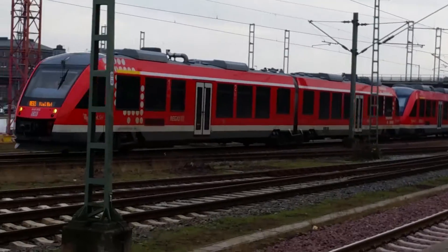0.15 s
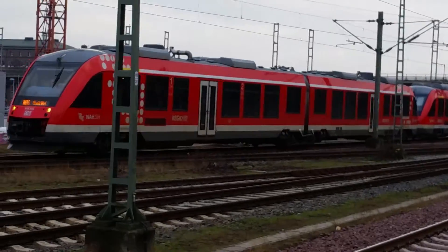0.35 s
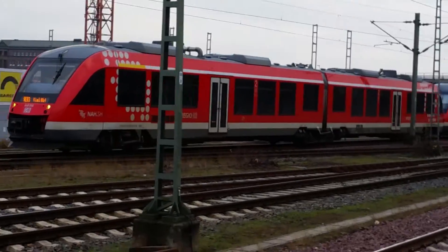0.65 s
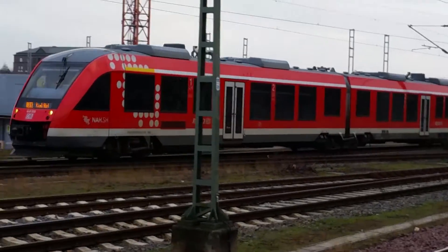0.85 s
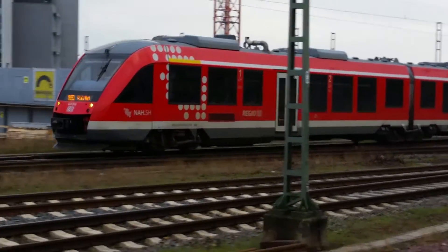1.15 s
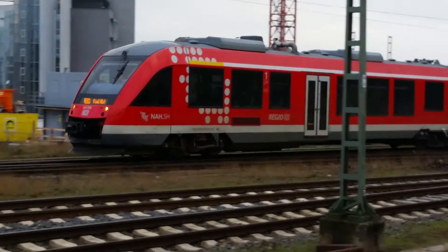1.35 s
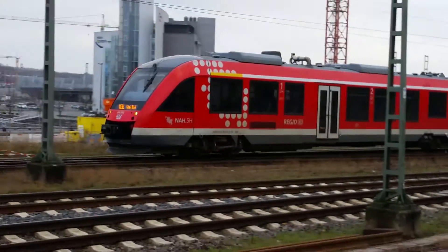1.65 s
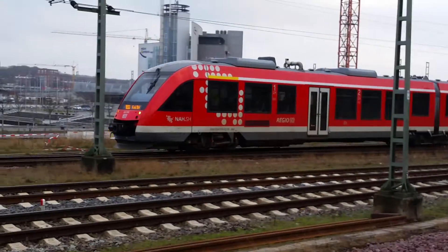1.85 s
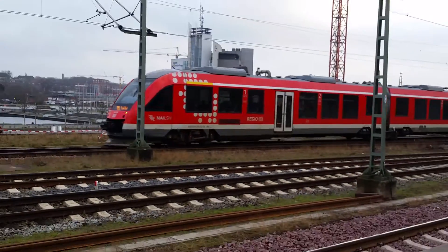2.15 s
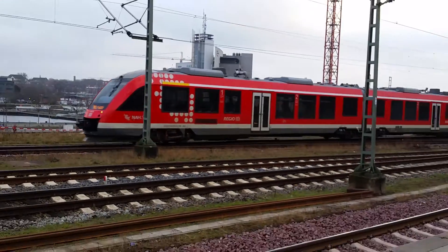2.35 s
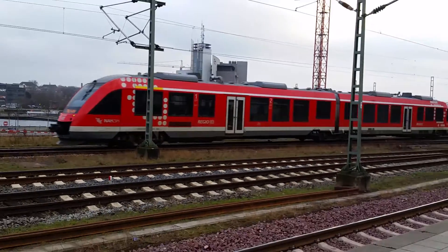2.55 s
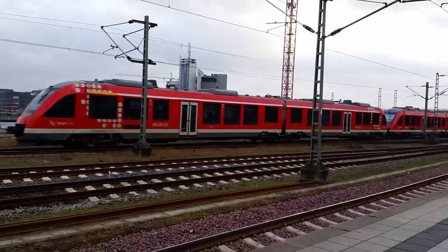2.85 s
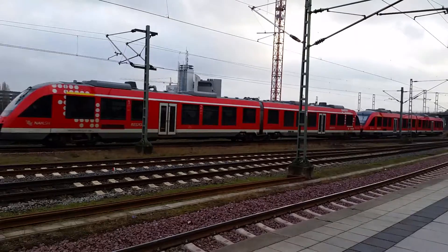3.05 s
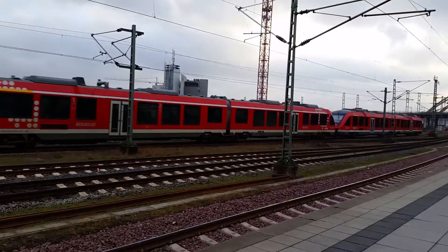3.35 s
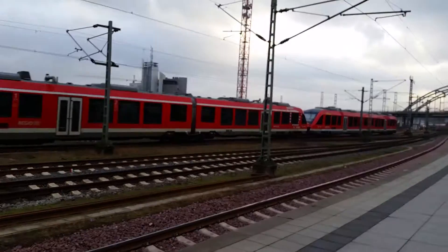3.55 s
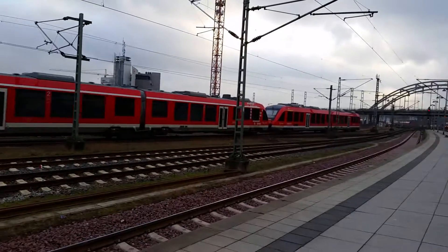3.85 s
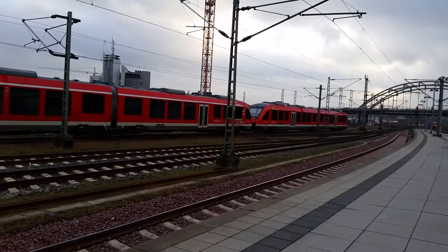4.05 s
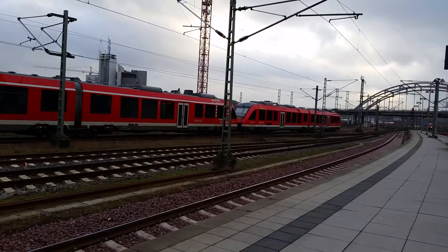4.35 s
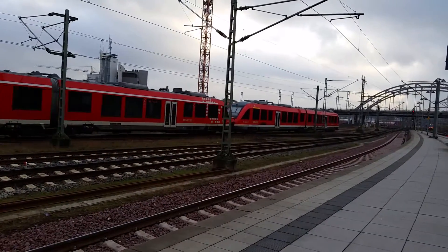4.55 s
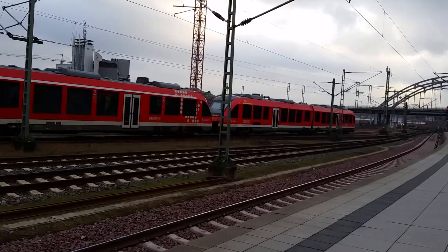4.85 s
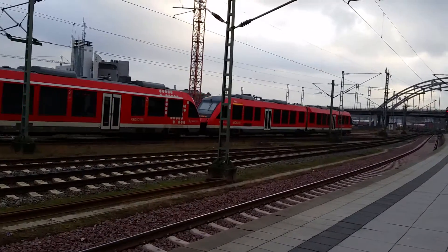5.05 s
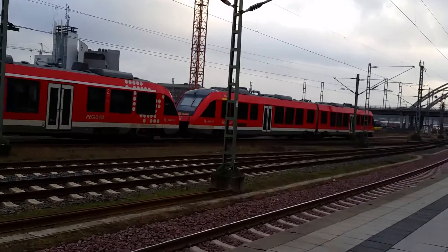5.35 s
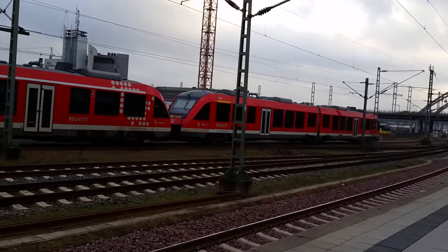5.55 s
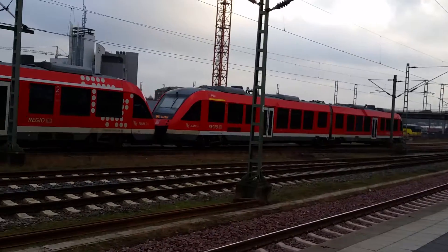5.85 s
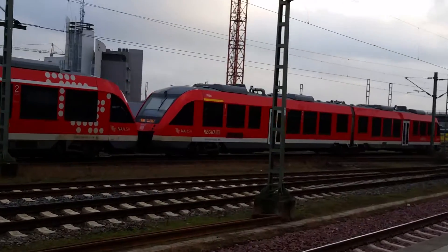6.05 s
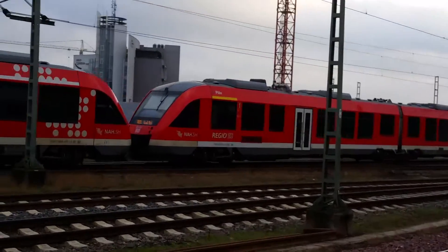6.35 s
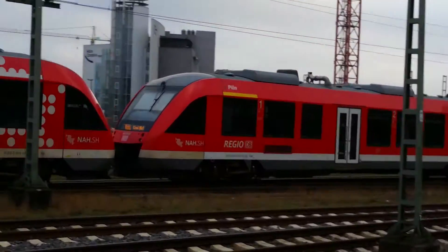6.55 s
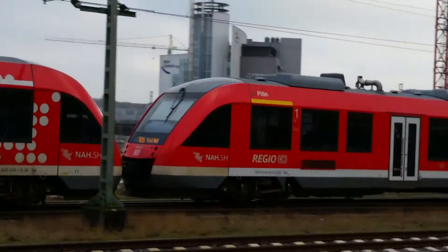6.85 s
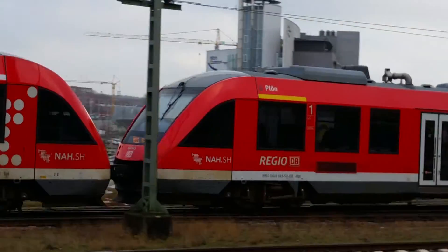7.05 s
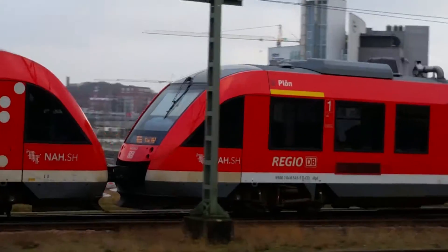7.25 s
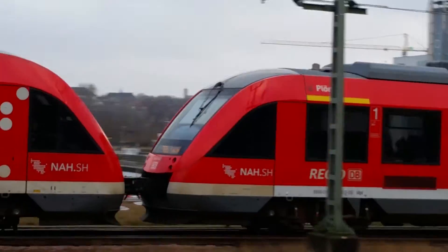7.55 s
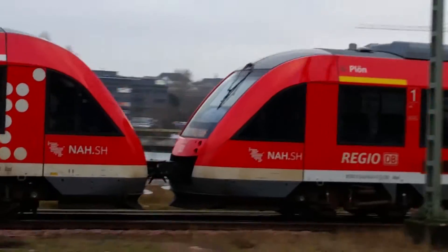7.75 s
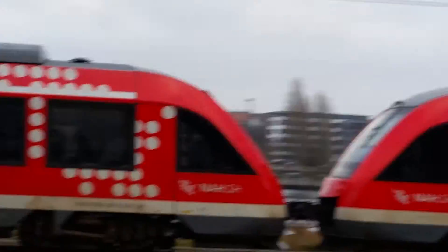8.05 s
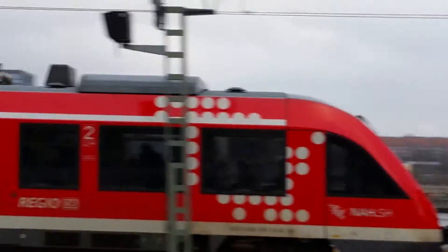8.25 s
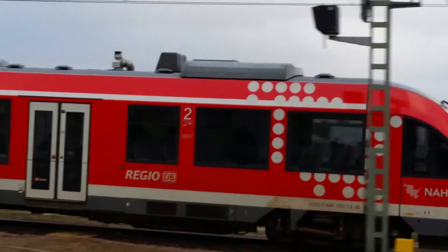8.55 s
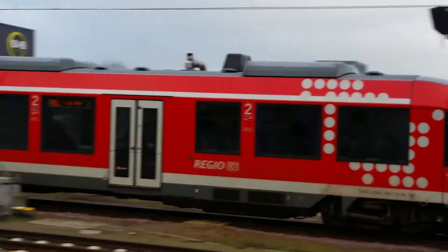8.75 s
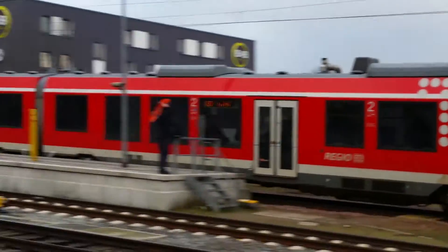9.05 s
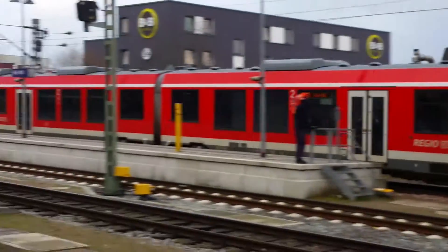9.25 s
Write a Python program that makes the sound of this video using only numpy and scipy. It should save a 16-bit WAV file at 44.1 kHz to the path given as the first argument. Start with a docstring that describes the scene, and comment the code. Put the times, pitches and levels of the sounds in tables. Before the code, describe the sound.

A pair of diesel railcars rolls slowly past a station platform, heard on a hand-held phone. A low rumble, booming wheels and a light fan hiss run throughout, gradually growing louder. Low engine hums swell in turn at about 0.4, 2.5 to 3, 4.5 and 7.4 seconds, the later ones sinking in pitch. Wheels thump and knock over joints in clusters around 1.5, 3.4, 5.4 and 6.4 seconds, with short, bright steel clanks. Brief air puffs come near 3.7, 5.4 and 5.8 seconds. At about 6.4 seconds a valve opens in a long, high hiss with a thin whistle; it eases at 7 and dies away after 7.7. A faint, thin flange squeal sounds near 4.9 seconds and again from 8.5 to 9, where the rumble is strongest and more thumps follow, up to the end at about 9.4 seconds.

```python
"""A station platform, with a pair of diesel railcars rolling slowly past. Underfloor engines hum by in turn
at their firing rate. Rough wheels make the track boom and ring, thump over joints and set loose steel
clanking; fans hiss and a flange sings. Air valves puff, then one vents in a long hiss with a thin whistle.
A hand-held phone pans along; its two ports colour the treble differently, and their balance shifts."""
import sys
import numpy as np
from scipy import signal
from scipy.fft import rfft, irfft, next_fast_len
from scipy.io import wavfile
from scipy.ndimage import uniform_filter1d, map_coordinates

SR = 44100
rng = np.random.default_rng(int(sys.argv[2]) if len(sys.argv) > 2 else 0)


def generate_wav(sig):
    """Save sig (samples, or channels by samples) to the path in sys.argv[1] as 16-bit PCM at SR."""
    pcm = np.round(np.clip(np.atleast_2d(sig).T, -1, 1) * 32767).astype(np.int16)
    wavfile.write(sys.argv[1], SR, pcm)


N = 414981
TIME = np.arange(N) / SR

# The phone turning. Each row: time in seconds, leftward lean of the treble in dB, left port's lead in ms.
PAN = [(0, -4.5, 0.0048), (3.2, -4.5, -0.0051), (3.6, -4, 0.32), (5.2, -1, 0.39), (6.2, -1, 0.43),
       (6.6, -3, 0.023), (7.5, -2, 0.12), (8.6, -6, 0.0062), (9.41, -4, -0.36)]


def engines():
    """Periodic excitation: each exhaust sounds its firing tone and weak orders, sinking in pitch."""
    # Each row: start and length of the loudest stretch and time of silence in seconds, level in dB, rise
    # and fall in dB/s, firing rate in Hz, time the pitch starts to sink in seconds, its slope in Hz/s.
    passes = [(0.33, 0.15, 0.85, -24, 24, 20, 93.8, 0.66, .5),
              (2.4, 0.71, 3.32, -20, 8.5, 20, 93.8, 2.86, 17.3),
              (4.5, 0.35, 5.66, -18, 34, 7.5, 105.4, 4.12, 12), (7.3, 0.24, 8, -24, 37, 6, 103.6, 7.4, 14)]
    # Exhaust orders. Each row: multiple of the firing rate, relative level in dB.
    orders = [(.5, -14), (1, 0.5), (2, -24.5), (2.5, -20.5)]
    lowest_ratio, fade_s = 0.82, 0.1
    out, wavers = np.zeros(N), [wobble(6.2) for _ in orders]
    for s, held, gone, top_db, rise, fall, first_hz, sinks, slope in passes:
        db = top_db - np.maximum(np.maximum(rise * (s - TIME), fall * (TIME - s - held)), 0)
        hz = np.clip(first_hz - slope * (TIME - sinks), lowest_ratio * first_hz, first_hz)
        fade = np.clip((gone - TIME) / fade_s, 0, 1)
        cycles = np.cumsum(hz * (1 + 0.0047 * wobble(14))) / SR
        for (order, order_db), waver in zip(orders, wavers):
            tone = np.sin(2 * np.pi * (order * cycles + rng.random()))
            out += fade * amp(db + order_db + 0.55 * order * waver) * tone
    return out


def rolling():
    """Roughness excitation: the wheels shake ground, rail and car floor into three bands of noise."""
    # Spectra. Each row: frequency in Hz, spectral level in dB.
    ground_spectrum = [(15, -33), (25, -1), (45, 1.5), (70, 5.5), (110, 1.5), (150, -6), (250, -42.5),
                       (600, -120)]
    boom_spectrum = [(90, -63), (130, -9.5), (180, -2.5), (215, 0.5), (240, -2), (268, 0.5), (320, -9),
                     (380, -13.5), (470, -14.5), (600, -25.5), (900, -43.5), (2500, -120)]
    roar_spectrum = [(320, -50), (550, -5), (808, -5.5), (1260, 1), (1590, -7.5), (1690, -11.5), (2160, -1),
                     (2570, -6), (2780, -5.5), (3600, -17), (4680, -15), (7920, -120)]  # peaks and valleys set by the echo off the ground
    ground_db, boom_db, roar_db = rolling_levels()
    shake = wobble(13)
    ground = amp(ground_db + 0.8 * shake) * rush(ground_spectrum, patchy_db=1)
    boom = amp(boom_db + 1.3 * shake) * rush(boom_spectrum, patchy_db=1)
    roar = amp(roar_db + 0.46 * shake) * rush(roar_spectrum, patchy_db=1.5)
    return ground + boom + roar


def rolling_levels():
    """Transient forcing: ground, boom and roar levels, in dB, surge as bogies cross the points."""
    # Each row: time in seconds, then base levels of ground rumble, wheel boom and rail roar in dB.
    base_levels = [(0, -35, -34.5, -43), (1.3, -33, -30.5, -42), (2.9, -32, -29.5, -40),
                   (3.14, -32.5, -27.5, -41.5), (4.1, -32, -29, -41.5), (5.15, -33.5, -26, -41),
                   (6.2, -30, -26, -40.5), (8.2, -27, -24, -40.5), (9.41, -29.5, -28, -39)]
    # Each row: time of the crossing in seconds, surge of the boom in dB, rise time constant in seconds.
    bogies = [(1.4, 6, 0.018), (3.54, 8, 0.12), (5.45, 4, 0.15), (5.97, -0.5, .1), (8.62, 5, 0.18)]
    decay_s, surge_weights = 0.68, [1.27, 1, 0.15]
    surge_db = sum(db * cusp(s, rise, decay_s) for s, db, rise in bogies)
    return np.array(curves(base_levels)) + np.outer(surge_weights, surge_db)


def thumps():
    """Soft impact: a wheel dropping at a joint radiates a few low cycles under a Gaussian envelope."""
    # Each row: time in seconds, level in dB, pitch in Hz.
    drops = [(1.405, -8.5, 200), (1.526, -10, 220), (1.574, -14.5, 250), (1.621, -11, 183),
             (1.826, -15.5, 248.4), (3.287, -7, 201), (3.348, -16.5, 242), (3.414, -15, 212),
             (3.538, -19, 189), (3.769, -16, 113), (5.298, -9, 197), (5.422, -8, 185), (5.525, -12.5, 187),
             (5.762, -14.5, 192), (5.962, -11, 229), (6.08, -14.5, 244), (6.364, -8.5, 203),
             (6.421, -12.5, 237), (6.487, -11.5, 210), (6.586, -18, 242), (6.625, -12, 250),
             (6.717, -13.5, 228), (7.093, -15, 260), (8.09, -13.5, 100), (8.32, -14.5, 200),
             (7.483, -15, 227), (8.456, -20, 242), (8.611, -14.5, 172), (9.063, -16, 256)]
    out, t = np.zeros(N), np.arange(SR // 10) / SR
    for s, db, hz in drops + lumps():
        envelope = np.exp(-0.5 * ((t * hz - 2.6) / 1.48) ** 2)
        add_at(out, s - 1.2 / hz, amp(db) * envelope * np.sin(2 * np.pi * hz * t))
    return out


def lumps(count=45, over_boom_db=2.5, centre_hz=216, spread=0.26):
    """Random impacts: time, level and pitch of small thumps about as strong as the boom around them."""
    when, size, pitch = rng.random((count, 3)).T
    at = ((0.02 + 0.97 * when) * N).astype(int)
    db = rolling_levels()[1][at] + over_boom_db + 8 * (size - 0.5)
    hz = centre_hz * (1 + spread * (2 * pitch - 1))
    return list(zip(at / SR, db, hz))


def knocks():
    """Hard impact: a wheel hitting a joint squarely gives a band-limited impulse and decaying noise."""
    # Each row: start in seconds, peak level in dB.
    hits = [(1.529, -19.5), (3.415, -26), (3.759, -21.5), (5.426, -18), (6.191, -23.5), (6.49, -27),
            (7.49, -21), (8.462, -21.5), (8.8, -20), (9.029, -21)]
    out, t = np.zeros(N), np.arange(SR // 10) / SR
    low_band = signal.butter(2, [200, 600], "band", fs=SR)
    for s, db in hits:
        blow = rng.standard_normal(len(t)) * amp(-60 * t / 0.12)
        blow[0] += 14  # the first contact
        burst = signal.lfilter(*low_band, blow)
        add_at(out, s, amp(db) * burst / np.abs(burst).max())
    return out


def clanks():
    """Free vibration: loose steel jolted at some joints rings in modes of new strength each time."""
    # Each row: start in seconds, level in dB, time to decay by 60 dB in seconds, pitch factor.
    jolts = [(1.53, -24, 0.087, 1.05), (1.542, -19, 0.091, 1.01), (1.753, -15, 0.032, 1),
             (3.043, -31, 0.12, 0.73), (3.418, -17, 0.069, 1), (3.435, -31, 0.43, .95),
             (5.657, -15.5, 0.038, 1.02), (6.49, -16, 0.077, 1)]
    # Each row: mode frequency in Hz, mean relative level in dB.
    steel_modes = [(4950, -17), (5220, -8), (5600, -21.5)]
    out, t = np.zeros(N), np.arange(SR // 4) / SR
    for s, db, ring_s, pitch in jolts:
        ring = sum(amp(mode_db + rng.normal(0, 2)) * rough_tone(pitch * hz, t, step_rad=0.13)
                   for hz, mode_db in steel_modes)
        crack = 0.45 * amp(-60 * t / 0.04) * rng.standard_normal(len(t))
        envelope = amp(db - 60 * t / ring_s) * (1 - np.exp(-t / 0.004))
        add_at(out, s, envelope * (ring + crack))
    return out


def track_bands():
    """Resonance and interference: narrow rail and wheel rings and broad roar bands swell as bogies pass."""
    # Each row: centre in Hz, bandwidth in Hz. The two broad bands are roar coloured by the ground echo.
    bands = [(268, 16.4), (420, 40), (1130, 370), (2140, 250), (2670, 70)]
    # One list per band. Each row: peak time in seconds, level in dB, rise and fall constants in seconds.
    band_swells = [
        [(2.2, -33, 0.73, 0.28), (3.35, -26.5, 0.15, 0.63), (4.85, -28.5, 0.3, 0.86), (6.6, -29, 0.86, 1),
         (8.4, -29.5, 0.46, 0.45), (9.05, -25.5, 0.29, 0.11)],
        [(2.04, -39.5, 0.39, 0.47)],
        [(2, -48, 1, 0.85), (2.9, -43.5, .5, 0.063)],
        [(1.4, -46, 0.44, 1), (2.9, -47, 1, 0.066), (4.5, -43.5, 0.91, 0.34), (7.4, -50, 0.55, .3)],
        [(2.9, -57, 0.32, .6), (4.9, -49, 0.4, 0.64), (7, -55, 0.66, 0.67), (8.7, -51.5, 0.71, 0.9)],
    ]
    return sum(swells(rows) * amp(0.68 * wobble(12)) * noise_band(*band)
               for band, rows in zip(bands, band_swells))


def puffs(flutter_hz=42):
    """Amplitude modulation: valves release short puffs of fluttering air noise."""
    # Each row: start in seconds, length in seconds, level in dB.
    openings = [(3.732, 0.1, -38.5), (5.417, 0.1, -35.5), (5.755, 0.1, -37), (8.814, 0.078, -43)]
    # Each row: frequency in Hz, spectral level in dB.
    puff_spectrum = [(1500, -2), (3800, -4.5), (4500, 4.5), (5700, -3.5), (6700, 1.5), (9000, -3),
                     (12000, -2.5), (16000, -14)]
    gate = sum(amp(db) * ramp(s, s + length, rise=0.013, fall=0.031) for s, length, db in openings)
    flutter = amp(2 * np.sin(2 * np.pi * flutter_hz * TIME))
    return gate * flutter * rush(puff_spectrum, patchy_db=1.5)


def vent():
    """Jet noise: one valve vents in a long hiss, with wavering whistles from its nozzle."""
    # Each row: frequency in Hz, spectral level in dB.
    jet_spectrum = [(3000, -24), (5500, -5), (7000, 0), (9000, 1), (11000, 3.5), (13500, 1.5), (16000, 1.5)]
    # Each row: whistle frequency in Hz, bandwidth in Hz, level relative to the jet in dB.
    whistles = [(10320, 330, -9.5), (13250, 400, -10), (14780, 300, -23), (12200, 300, -24)]
    open_s, ease_s, shut_s = 6.443, 7, 7.68
    jet = rush(jet_spectrum, patchy_db=2.0, streak_db=1.5)
    for hz, width_hz, db in whistles:
        jet += amp(db + 1.5 * wobble(9.4)) * noise_band(hz, width_hz)
    since = lambda s: np.maximum(TIME - s, 0)
    level_db = -33.5 - 3.5 * (TIME < open_s + 0.08)  # throttled at first, then full blast
    level_db -= 4 * np.minimum(since(ease_s) / 0.04, 1)  # eases by a step
    level_db -= 0.5 * since(ease_s) + 9 * since(shut_s)  # sags, then dies away
    opening = np.minimum(since(open_s) / 0.006, 1)
    return opening * amp(level_db + 0.2 * wobble(28)) * jet * balance(3)


def squeal(hz=2680):
    """Friction-excited vibration: a flange touches the rail and sings, rough and flickering."""
    # Each row: peak time in seconds, level in dB, rise and fall time constants in seconds.
    touches = [(4.89, -44, .05, .05), (8.56, -43, .06, .09), (8.8, -47, .04, .03), (8.94, -45, .07, .1)]
    tone = np.sqrt(2) * rough_tone(hz, TIME, step_rad=0.07)
    return swells(touches) * amp(1.5 * wobble(40)) * tone


def fans():
    """Air absorption: the hiss of cooling fans and wheels lacks its top while the train is far."""
    # Each row: time in seconds, level in dB, gain of the top band in dB.
    hiss_levels = [(0, -49.5, -5.5), (.9, -47, -6), (1.75, -45.5, -2), (2.7, -44.5, 1), (4.3, -44.5, 3.5),
                   (6.4, -45, 1.5), (7.5, -44.5, 5), (9.41, -46.5, 5)]
    # Each row: frequency in Hz, spectral level in dB.
    fan_spectrum = [(2500, -45), (3300, 2.5), (3700, -2), (4300, 3.5), (4700, -0.5), (5150, 3), (5700, -4),
                    (9500, -5), (12000, -3.5), (13500, -5), (16000, -11.5)]
    level_db, bright_db = curves(hiss_levels)
    hiss = amp(level_db + 0.8 * wobble(24)) * rush(fan_spectrum, patchy_db=1.5, streak_db=2.5)
    top = filtered(hiss, lambda hz: np.clip((hz - 5400) / 1000, 0, 1))
    return hiss + (amp(bright_db) - 1) * top


def sizzle(fade_s=0.15):
    """Narrowband noise: high bands, unrelated at the two ports, slide in pitch as the wheels go by."""
    # Each row: start and end in seconds, first and last frequency in Hz, bandwidth in Hz, level in dB.
    bands = [(2.2, 3.15, 11000, 13000, 440, -55), (2.9, 6.6, 9380, 12000, 250, -65),
             (4.3, 5, 14300, 12900, 900, -50), (3, 4.9, 11600, 11950, 740, -52),
             (8.2, 11, 11300, 14000, 1500, -45.5)]
    out = np.zeros((2, N))
    for start, end, from_hz, to_hz, width_hz, db in bands:
        slow = unit(signal.lfilter(*signal.butter(2, width_hz / SR), rng.standard_normal((2, 2, N))))
        phase = 2 * np.pi * np.cumsum(np.interp(TIME, [start, end], [from_hz, to_hz])) / SR
        gate = ramp(start - fade_s, end, fade_s, fade_s)
        out += amp(db) * gate * (slow[0] * np.cos(phase) + slow[1] * np.sin(phase))
    return out * amp(1.1 * wobble(25))


def shadowed(treble):
    """Acoustic shadow: the phone gives each port a constant treble colour; the lean follows the pan."""
    # Each row: frequency in Hz, left-over-right colouring in dB before each port's weight.
    shadow = [(3200, -4.5), (4600, -6.5), (6000, -5.5), (7000, 0.5), (8500, 11), (10000, 5.5),
              (12000, -5.5), (14000, 8), (16000, -3)]
    leaning = treble * balance(curves(PAN)[0])
    return filtered(leaning, lambda hz: amp(np.outer([0.27, -0.75], along(shadow, hz))))


def turned(x):
    """Path difference: as the phone pans, one port hears the train a little before the other."""
    lead_samples = curves(PAN)[1] * SR / 1000
    return np.array([map_coordinates(port, [np.arange(N) + half * lead_samples], order=5, mode="mirror")
                     for port, half in zip(x, (0.5, -0.5))])


def rush(spectrum, patchy_db, streak_db=0):
    """Partly coherent stereo noise, with the brief patches and rising streaks of moving reflections."""
    # Each row: frequency in Hz, correlation between left and right.
    coherence = [(60, 0.84), (140, 0.9), (290, 1), (640, 0.54), (1400, 0.19), (2700, 0.2), (6800, 0.12),
                 (15000, 0.048)]
    spectrogram = signal.stft(rng.standard_normal((2, N + 1024)), nperseg=1024)[2]
    shape = spectrogram.shape[1:]
    gain_db = patchy_db * patches(shape, bins=6, frames=5)
    if streak_db:
        row, frame = np.indices(shape)
        rising_row = (row - frame * row // 6000) % len(row)
        gain_db += streak_db * patches(shape, bins=9, frames=50)[rising_row, frame]
    pair = signal.istft(spectrogram * amp(gain_db), nperseg=1024)[1][:, :N]

    def mid_side_gains(hz):
        angle = np.arccos(np.clip(along(coherence, hz), -1, 1)) / 2
        return amp(along(spectrum, hz)) * [np.cos(angle), np.sin(angle)]

    mid, side = filtered(pair, mid_side_gains)
    return np.array([mid + side, mid - side]) / np.std(mid)


def patches(shape, bins, frames):
    """A random field of rms 1, smoothed by moving averages over frequency and time."""
    field = uniform_filter1d(rng.standard_normal(shape), size=bins, axis=-2)
    return unit(uniform_filter1d(field, size=frames, axis=-1))


def noise_band(hz, width_hz):
    """Noise of rms 1 under one bell-shaped spectral peak."""
    return unit(filtered(rng.standard_normal(N), lambda f: 1 / (1 + (2 * (f - hz) / width_hz) ** 2)))


def rough_tone(hz, t, step_rad):
    """Phase diffusion: a sine roughened by a random phase step at every sample."""
    return np.sin(2 * np.pi * hz * t + np.cumsum(rng.normal(0, step_rad, len(t))))


def wobble(rate):
    """Random modulation: a smooth curve with `rate` knots a second."""
    knots, coarse = rng.standard_normal(int(N * rate / SR) + 4), TIME[::64]
    return np.interp(TIME, coarse, map_coordinates(knots, [coarse * rate]))


def cusp(s, rise, fall):
    """Exponential growth to 1 at time s, then exponential decay."""
    return np.exp(np.minimum((TIME - s) / rise, (s - TIME) / fall))


def swells(rows):
    """A sum of gains that each grow to a peak and decay."""
    return sum(amp(db) * cusp(s, rise, fall) for s, db, rise, fall in rows)


def ramp(start, end, rise, fall):
    """A trapezoidal gate: 0 outside, 1 inside."""
    return np.clip(np.minimum((TIME - start) / rise, (end - TIME) / fall), 0, 1)


def filtered(x, response):
    """Linear filtering: the spectrum of x times a function of frequency."""
    size = next_fast_len(N + 8192)
    return irfft(rfft(x, size) * response(np.fft.rfftfreq(size, 1 / SR)), size)[..., :N]


def along(points, hz):
    """Interpolation of (Hz, value) points on a logarithmic frequency axis."""
    freqs, values = np.transpose(points)
    return np.interp(np.log(hz + 1), np.log(freqs + 1), values)


def curves(rows):
    """Interpolation in time: one value per sample for each column after the first."""
    times, *columns = np.transpose(rows)
    return [np.interp(TIME, times, column) for column in columns]


def add_at(out, s, sound):
    """Superposition of a sound onto out, starting at s seconds."""
    span = out[round(s * SR):][:len(sound)]
    span += sound[:len(span)]


def balance(db):
    """Level difference: a pair of gains that puts left above right by db."""
    return amp(np.vstack([db / 2, -db / 2]))


def amp(db):
    """Decibels as an amplitude ratio."""
    return 10 ** (np.asarray(db) / 20)


def unit(x):
    """Normalisation to rms 1."""
    return x / np.sqrt(np.mean(x ** 2) + 1e-20)


def scene():
    """Superposition of all sources at the two ports; only the treble layers are shadowed."""
    hiss = fans()
    impacts = thumps() + knocks()
    treble = hiss + clanks() + puffs() + vent() + sizzle()
    train = engines() + impacts + track_bands() + rolling() + shadowed(treble)
    return turned(train) + squeal()


def record(dry, top_hz=15800):
    """Frequency response: the two ports differ in sensitivity and share a band limit."""
    # Each row: frequency in Hz, left port's level over the right's in dB.
    port_mismatch = [(60, 1.5), (800, 3), (1650, 1.5), (2600, 2), (3400, 3.5), (16000, 2.5)]
    return filtered(dry, lambda hz: balance(along(port_mismatch, hz)) * (hz < top_hz))


dry = scene()
out = record(dry)
generate_wav(out)
```